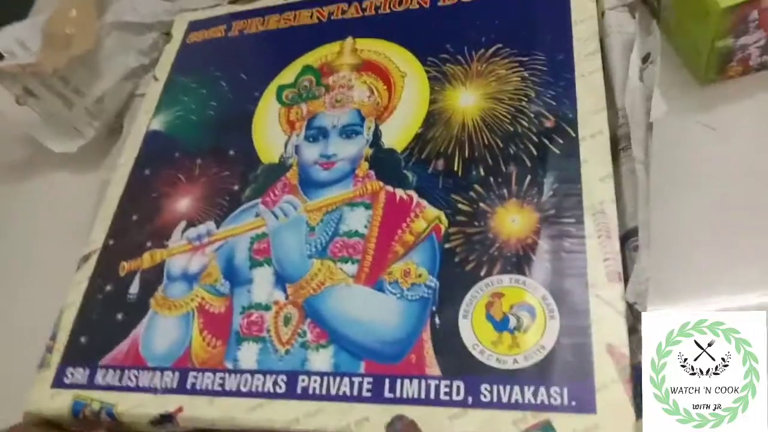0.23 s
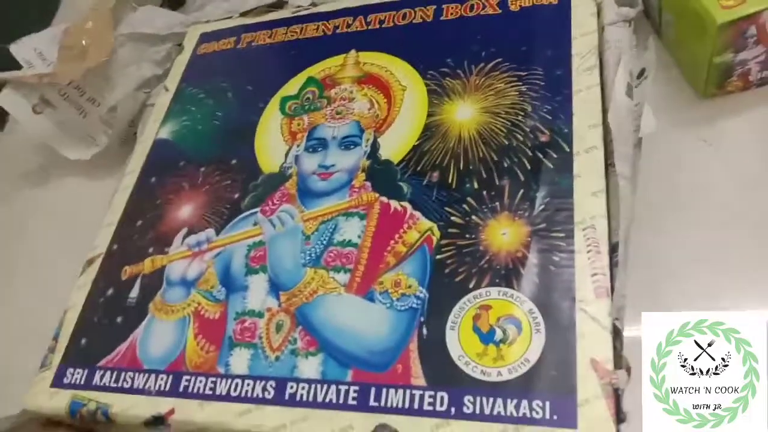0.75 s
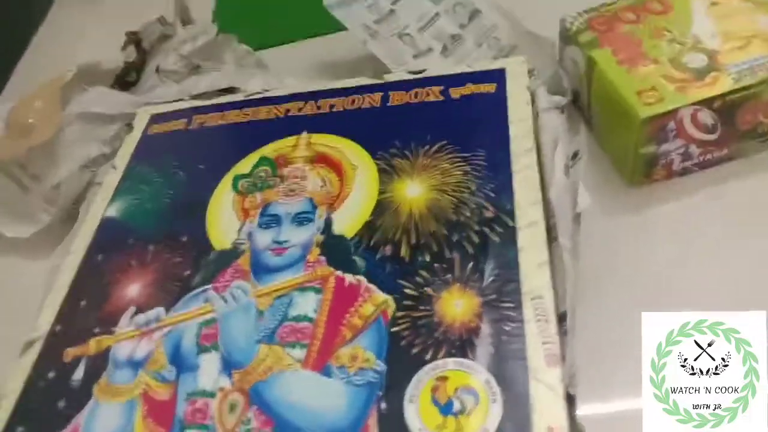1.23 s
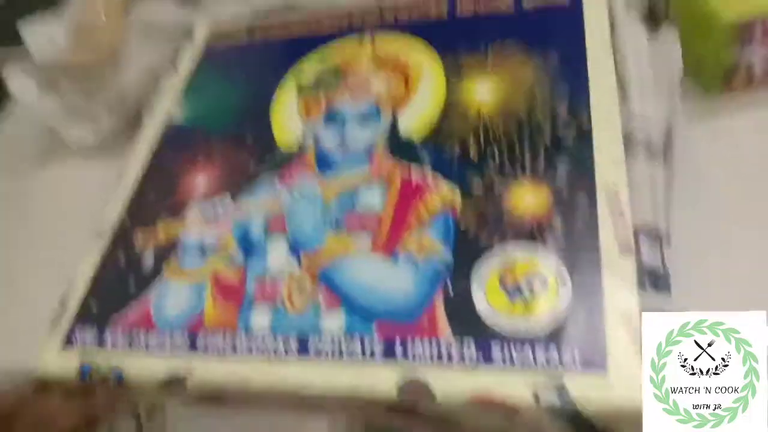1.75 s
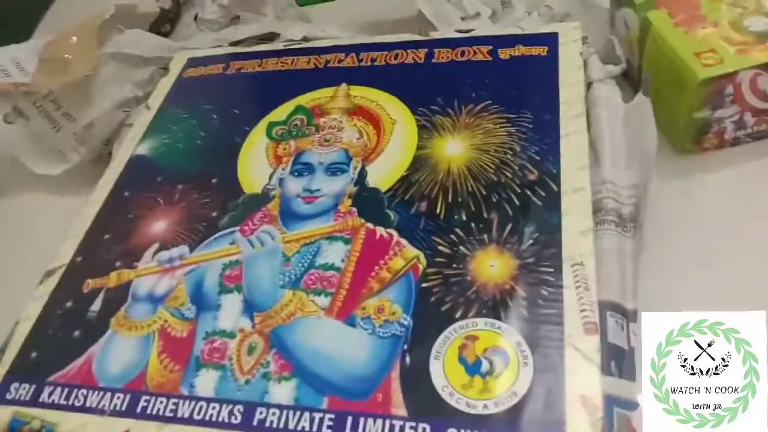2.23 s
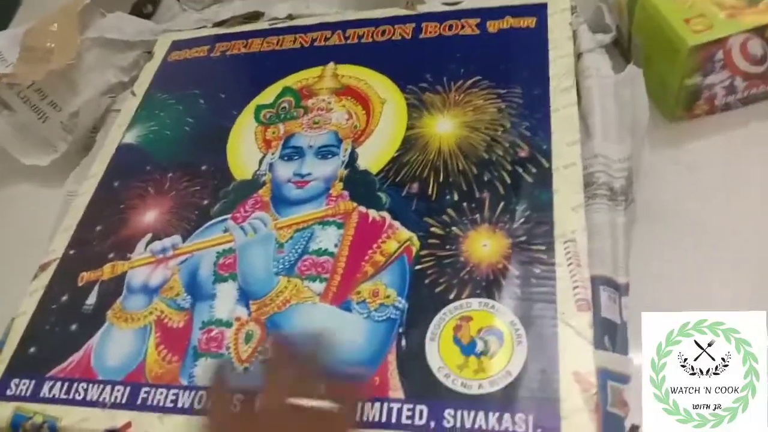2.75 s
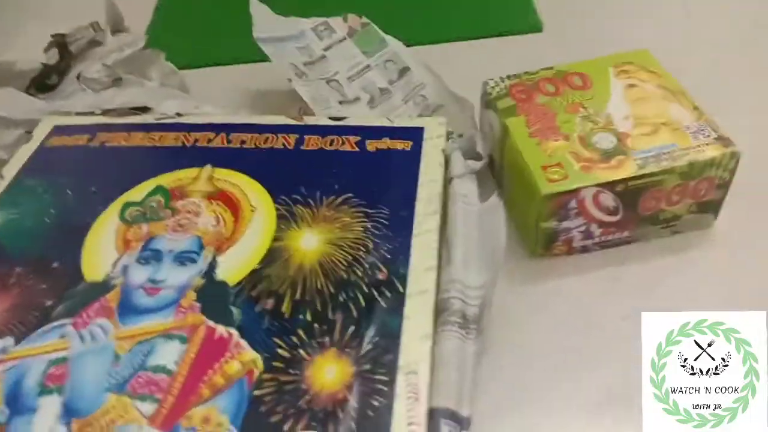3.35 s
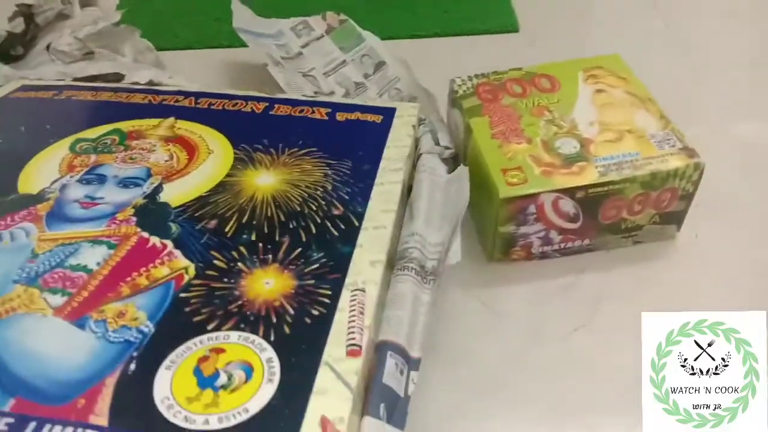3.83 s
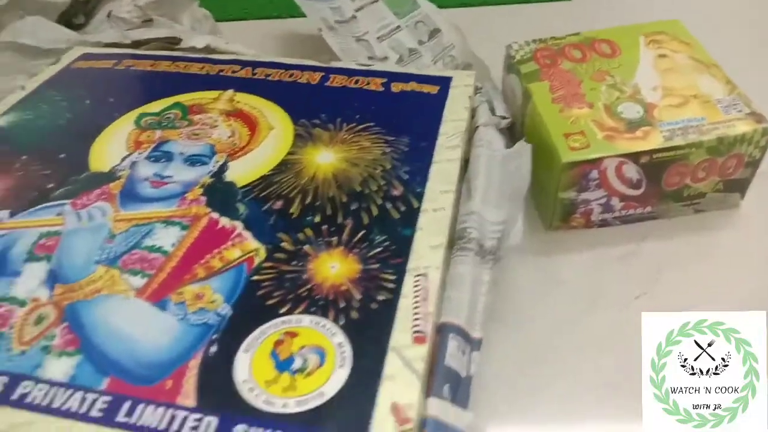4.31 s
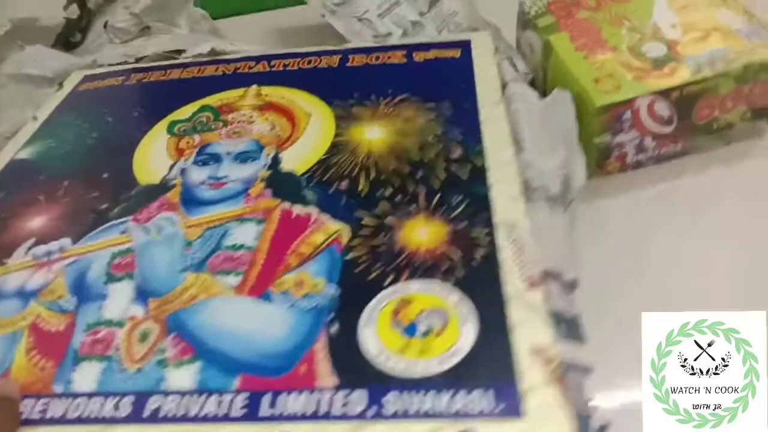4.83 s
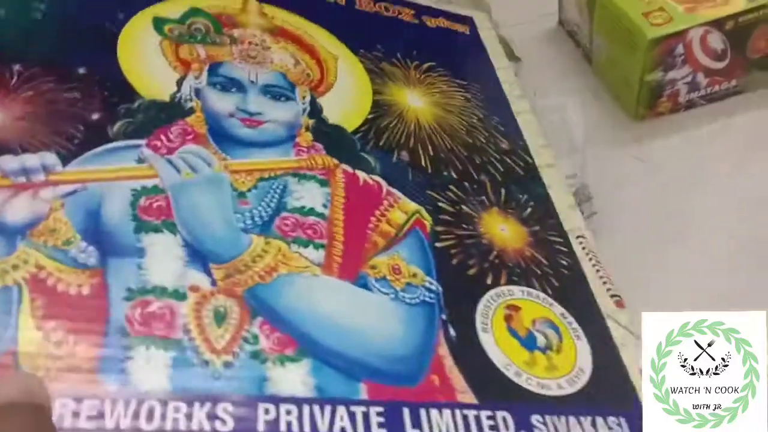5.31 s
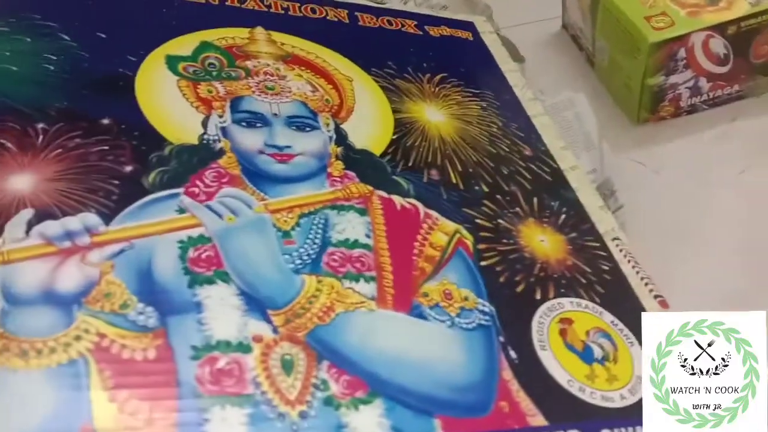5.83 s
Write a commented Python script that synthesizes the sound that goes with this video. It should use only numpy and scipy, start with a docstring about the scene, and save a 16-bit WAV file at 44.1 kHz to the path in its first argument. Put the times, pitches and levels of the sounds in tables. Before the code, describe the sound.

Hands rustle stiff paper and bump a big cardboard box about, sharp crackles and dull thuds ringing in a bare, reverberant room.

```python
"""Paper crinkles and snaps at once over a steady rush of room air, in a bare, echoing tiled room.
A large cardboard box is lifted, tilted and shifted on its newspaper wrapping: swarms of tiny buckles make
the rustle, single creases the snaps, dense stick-slip the rasp. Pushes and rubbing hands excite the damped
modes of the hollow box. Filtered noise makes the air, decaying noise bands the reverberation;
the hand-held phone adds narrow resonances to everything."""
import sys
import numpy as np
from scipy import signal
from scipy.fft import rfft, irfft
from scipy.io import wavfile
from scipy.ndimage import uniform_filter1d

SR = 44100
rng = np.random.default_rng(int(sys.argv[2]) if len(sys.argv) > 2 else 0)


def master(y):
    """Save y as 16-bit WAV."""
    cut = np.clip(np.atleast_2d(y).T, -1, 1)
    pcm = np.round(cut * 32767)  # scale
    wavfile.write(sys.argv[1], SR, pcm.astype(np.int16))


N = 267376
TIME = np.arange(N) / SR
# Event levels in the tables are source levels, ahead of the gains of the mix.
# spectrum of crumpling paper: f/Hz, level/dB
PAPER_SPECTRUM = [(60, -54), (200, -18), (400, -5), (700, -5), (1100, -2), (1700, -2), (2900, 1.5),
                  (3800, -1), (4600, -7), (7000, -10.5), (10000, -5.5), (12000, -13), (15500, -9.5)]
DRAG_SAG_DB_PER_S = 1.5  # drags and scrapes ease slightly while they last


def undb(db):
    """Level to amplitude: 20 dB are a factor of ten."""
    return 10 ** (np.asarray(db) / 20)


def unit(x):
    """Normalisation to an rms value of 1."""
    return x / np.sqrt(np.mean(x ** 2))


def on_log_axis(hz, points):
    """Interpolation of (f/Hz, value) points on a logarithmic frequency axis."""
    f, value = np.transpose(points)
    return np.interp(np.log(np.maximum(hz, 1)), np.log(f), value)


def colour(x, points, size=2048):
    """Minimum-phase filtering: folding the cepstrum makes a (f/Hz, level/dB) response causal."""
    hz = np.arange(size // 2 + 1) * SR / size
    cepstrum = irfft(np.log(undb(on_log_axis(hz, points))))
    cepstrum[1:size // 2] *= 2
    cepstrum[size // 2 + 1:] = 0
    impulse_response = irfft(np.exp(rfft(cepstrum)))
    return signal.fftconvolve(x, impulse_response)[:len(x)]


def ring(x, hz, width_hz):
    """A single damped resonance, with gain 1 at its centre."""
    return signal.lfilter(*signal.iirpeak(hz, hz / width_hz, fs=SR), x)


def lowpass(x, hz, order=2):
    """Butterworth low-pass: a passband without ripple."""
    return signal.sosfilt(signal.butter(order, min(hz, .45 * SR), fs=SR, output="sos"), x)


def brighten(x, db, corner_hz=4800):
    """Spectral tilt: the treble rises by db and the lows fall by half of it, as taut paper is brighter."""
    low = lowpass(x, corner_hz, order=1)
    return low * undb(-db / 2) + (x - low) * undb(db)


def walk(rate):
    """Slow random modulation: straight lines between normal deviates, rate of them per second."""
    knots = rng.standard_normal(int(N / SR * rate) + 2)
    return np.interp(TIME * rate, np.arange(len(knots)), knots)


def slips(rate, spread_db, limit_db):
    """Stick-slip as random impulses, rate per second: many weak ones and a few strong ones."""
    when, strength, side = rng.random((int(rate * N / SR), 3)).T
    level_db = np.minimum(-spread_db * np.log(1 - strength), limit_db)
    impulses = undb(level_db) * np.sign(side - .5)
    return unit(np.bincount((when * N).astype(int), impulses, N))


def add(track, s, sound):
    """Superposition of a sound onto a track from time s."""
    i = max(int(s * SR), 0)
    track[i:i + len(sound)] += sound[:max(N - i, 0)]


def burst_level(x, db, window_s):
    """Energy scaling: a short sound gets the energy of db rms held for window_s."""
    return x * undb(db) * np.sqrt(window_s * SR / np.sum(x ** 2))


def gesture(start, rise, hold, sag_db_per_s, release_s):
    """Envelope of one hand movement: linear attack, steady sag in dB, exponential release."""
    since = TIME - start - rise
    attack = np.clip(1 + since / max(rise, .002), 0, 1)
    sag = undb(-sag_db_per_s * np.maximum(since, 0))
    return attack * sag * np.exp(-np.maximum(since - hold, 0) / release_s)


def room_air(level_db=-43.0, side_db=-25.5, thinning=0.76):
    """Broadband noise: a steady rush whose low bands thin out at random, each on its own; mid and side."""
    # spectrum of the rush: f/Hz, level/dB
    air_spectrum = [(25, -16), (60, -13.5), (130, -0.5), (260, -8.5), (420, 9.5), (700, -3.5), (1100, 2.5),
                    (1800, -2), (2900, -2.5), (5000, -14.5), (8000, -37), (11000, -20), (12500, -56)]
    mid, side = (unit(colour(rng.standard_normal(N), air_spectrum)) for _ in range(2))
    for hz in np.geomspace(90, 750, num=5):
        missing_share = np.clip(thinning * walk(16), 0, .9)
        mid = mid - missing_share * ring(mid, hz, .5 * hz)
    return np.array([mid, undb(side_db) * side]) * undb(level_db + walk(7.3))


def room_tail(build_s=0.0012, size=88200):
    """Diffuse reverberation of hard walls with unit energy: each band decays at its own rate."""
    # reverberation time of the tiled room: f/Hz, T60/s
    decay_times = [(100, 1.64), (400, 1.54), (1200, 1.15), (3000, 0.91), (6000, 0.8), (12000, 0.21)]
    t, hz = np.arange(size) / SR, np.arange(size // 2 + 1) * SR / size
    noise, centres = rfft(rng.standard_normal(size)), np.array(decay_times)[:, 0]
    tail = 0
    # each row of the identity matrix gives one band its share of the spectrum
    for share, (_, t60) in zip(np.eye(len(centres)), decay_times):
        band = irfft(noise * on_log_axis(hz, np.column_stack([centres, share])), size)
        tail = tail + band * np.exp(-np.log(1000) * t / t60)
    return unit(tail * (1 - np.exp(-t / build_s))) / np.sqrt(size)


def taps(hz=1282, width_hz=210, decay_s=0.003, size=2048):
    """Resonance under impact: dull contacts mostly ring the phone's case, with neither bass nor treble."""
    # contacts: t/s, level/dB
    contacts = [(0.693, -33), (0.707, -34), (1.689, -34), (2.193, -42), (2.928, -36), (3.084, -41),
                (3.573, -47), (3.701, -37), (3.916, -36.5), (4.143, -37), (5.002, -35), (5.261, -41)]
    out, t = np.zeros(N), np.arange(size) / SR
    for s, db in contacts:
        contact = rng.standard_normal(size) * np.exp(-t / decay_s)
        ringing = ring(ring(contact, hz, width_hz), hz, width_hz)
        add(out, s, burst_level(ringing, db, window_s=0.0046))
    return out


def cardboard(push):
    """Modal superposition: the hollow box answers with damped modes and radiates little below the lowest."""
    # modes of panels and cavity: f/Hz, width/Hz, level/dB
    box_modes = [(63, 16, 2), (88, 40, 1.5), (133.6, 29, 2.5), (179.5, 28, 3), (227, 31, 0), (292.3, 20, 5),
                 (345, 21, -2), (413, 25, -1.5), (508, 62, 0.5), (634, 123, 2.5), (827, 110, 1.5)]
    panels = sum(undb(db) * ring(push, hz, width) for hz, width, db in box_modes)
    return signal.sosfilt(signal.butter(2, 55, "highpass", fs=SR, output="sos"), panels)


def rub(width_share=1.2, trim_db=-1, uneven_db=4.0, grip_db=-59, grip_hz=150, release_s=0.07):
    """Stick-slip friction of hands and wrapping drums on the box; each contact place favours other modes."""
    # drags on the cardboard: start t/s, rise/s, hold/s, level/dB ahead of the trim, centre f/Hz
    hand_drags = [(0, .02, 0.14, -62, 140), (0.468, 0.018, 0.08, -44.5, 380), (0.688, .01, .12, -48, 750),
                  (0.824, 0.063, 0.026, -48.5, 129), (1.68, 0.025, 0.18, -43.5, 257),
                  (2.114, 0.043, 0.2, -57, 110), (3, 0.038, 0.024, -46, 165),
                  (3.306, 0.056, 0.085, -46, 300), (3.437, 0.0055, .012, -36.5, 655),
                  (3.976, 0.047, 0.2, -46, 200), (4.54, 0.073, 0.25, -40.5, 326),
                  (4.88, 0.093, 0.34, -42.5, 330), (5.446, 0.048, 0.65, -46, 133)]

    def drag(hz):
        """Band-limited stick-slip drives the modes of the box."""
        friction = slips(rate=670, spread_db=0.0, limit_db=-0.5)
        return unit(cardboard(ring(friction, hz, width_share * hz)))

    out = undb(grip_db) * drag(grip_hz)  # fingers shift faintly on the box all along
    for start, rise, hold, db, hz in hand_drags:
        envelope = gesture(start, rise, hold, DRAG_SAG_DB_PER_S, release_s)
        out = out + undb(db) * envelope * drag(hz)
    return out * undb(trim_db + uneven_db * np.minimum(walk(20), 1))


def bumps(size=16384, knock_db=-15.0, scuff_db=-27, soft_hz=1500):
    """Impulse excitation: a push, then a short scuff as the box settles; the spot hit favours some modes."""
    # bumps: t/s, level/dB, centre f/Hz (low where the whole box flexes), scuff decay/s
    box_bumps = [(.425, -46.5, 136, 0.015), (0.696, -34.5, 320, 0.065), (0.918, -42, 186, 0.0095),
                 (1.076, -45, 110, 0.038), (1.686, -39, 183, 0.017), (1.753, -44, 200, .015),
                 (1.934, -35, 201, 0.024), (2.127, -43, 113, 0.0081), (2.186, -39, 95.4, 0.052),
                 (2.241, -41, 94, 0.018), (3.075, -40.5, 186, 0.023), (3.11, -39, 93, 0.013),
                 (3.448, -26.5, 213, 0.0099), (3.467, -35, 557, .02), (3.494, -44, 330, .01),
                 (3.521, -42, 240, 0.0086), (3.575, -35, 285, 0.017), (3.63, -43, 198, 0.023),
                 (4.023, -48, 136, 0.032), (4.166, -42, 435, 0.027), (4.624, -47, 233, 0.021),
                 (4.682, -42, 276, .015), (4.93, -40, 161, 0.013), (5.04, -42, 140, 0.018),
                 (5.101, -41, 165, 0.013), (5.571, -50, 151, 0.015), (5.969, -36, 160, 0.088)]
    out, t = np.zeros(N), np.arange(size) / SR
    for s, db, hz, scuff_s in box_bumps:
        scuff = rng.standard_normal(size) * np.exp(-t / scuff_s)
        push = (t == 0) + undb(scuff_db) * scuff
        flex = ring(ring(push, hz, 0.7 * hz), hz, 0.7 * hz)
        knock = ring(ring(push, 3.2 * hz, 2 * hz), 3.2 * hz, 2 * hz)
        force = lowpass(flex + undb(knock_db) * knock, soft_hz)
        add(out, s, burst_level(cardboard(force), db, window_s=0.03))
    return out


def scrape(uneven_db=2.5, broad_db=-5, hz=2810, width_hz=4800, release_s=0.017):
    """Dense stick-slip: the box slides over the newspaper with one continuous bright rasp."""
    # slides: start t/s, rise/s, hold/s, level/dB
    slides = [(4.876, .06, .16, -39), (5.742, .04, .11, -44), (5.975, .02, .1, -39)]
    gain = 0
    for start, rise, hold, db in slides:
        gain = gain + undb(db) * gesture(start, rise, hold, DRAG_SAG_DB_PER_S, release_s)
    sheet = unit(colour(slips(rate=5000, spread_db=2.5, limit_db=10), PAPER_SPECTRUM))
    rasp = unit(ring(ring(sheet, hz, width_hz), hz, width_hz))
    uneven = undb(uneven_db * np.clip(walk(40), -1.5, 1.5))
    return unit(rasp + undb(broad_db) * sheet) * gain * uneven


def paper_motion(restless_db=3, held_db=-53.5, held_bright_db=-3, sag_db_per_s=25.5, release_s=0.034):
    """Power addition: strokes join the faint crinkling of the held sheet; gives gain and brightness/dB."""
    # pause with the held paper at rest: from t/s, to t/s
    rest = (4.25, 4.5)
    # crumpling strokes: start t/s, rise/s, hold/s, level/dB, brightness/dB
    strokes = [(0, 0.0044, 0.091, -42, 3.5), (0.224, 0.026, 0.17, -40, -1.5),
               (0.474, 0.0091, 0.077, -36, 1.5), (0.609, 0.07, 0.044, -38, 6.5),
               (0.696, 0.012, 0.15, -35, -1.5), (0.823, 0.03, 0.2, -39.5, 4.5),
               (1.105, 0.022, 0.69, -46.5, 4.5), (1.56, 0.11, 0.023, -35.5, 1),
               (1.683, 0.0099, 0.085, -36, -3), (1.89, 0.053, 0.12, -45.5, -0.5),
               (2.223, 0.035, 0.012, -44, -2), (2.353, 0.025, 0.017, -44, 2),
               (2.684, 0.017, 0.0082, -47, 1.5), (2.928, 0.018, 0.19, -51.5, -21),
               (3.234, 0.14, 0.17, -49, -14), (3.456, 0.16, 0.17, -37, -1), (3.8, 0.081, 0.38, -42, -9.5),
               (4.054, 0.065, 0.11, -40, 0), (4.53, .04, .04, -43, -3), (4.59, 0.03, 0.046, -36, 0),
               (4.842, 0.13, 0.14, -34, -5), (5.159, 0.037, 0.094, -41, 1),
               (5.373, 0.063, 0.033, -41, -0.5), (5.51, 0.035, 0.04, -39.5, 3),
               (5.699, 0.073, 0.022, -37.5, -1.5), (5.828, 0.038, 0.019, -38.5, -7.5),
               (5.942, 0.032, 0.067, -43, -12)]
    held = uniform_filter1d(1. * ((TIME < rest[0]) | (TIME > rest[1])), size=2048)
    held_gain = held * undb(held_db + restless_db * np.minimum(walk(10), 1))
    power = held_gain ** 2 + 1e-12
    bright = power * held_bright_db
    for start, rise, hold, db, bright_db in strokes:
        # the sheet gives way under the hand, then settles
        stroke = (undb(db) * gesture(start, rise, hold, sag_db_per_s, release_s)) ** 2
        power, bright = power + stroke, bright + stroke * bright_db
    return np.sqrt(power), bright / power


def rustle(gain, bright_db, sliding_db=-7, flurry_db=3.5, crowd_db=-36, facet_db=4.5,
           scrape_s=0.0018, size=512):
    """Crackling noise: fibres slide, creases buckle in flurries and scrape facets, which take turns."""
    sliding = slips(rate=7000, spread_db=3, limit_db=15)
    facets = 0
    for hz in np.geomspace(900, 11200, num=9):
        buckles = slips(rate=110, spread_db=5.5, limit_db=16)
        facet_scrape = rng.standard_normal(size) * np.exp(-np.arange(size) / SR / scrape_s)
        scraping = signal.oaconvolve(buckles, facet_scrape)[:N]
        facet = unit(ring(scraping, hz, 0.31 * hz)) * hz ** 0.44
        facets = facets + facet * undb(facet_db * np.minimum(walk(25), 1))
    sheet = unit(colour(unit(facets) + undb(sliding_db) * sliding, PAPER_SPECTRUM))
    # in a strong stroke so many buckles overlap that the flurries even out
    flurries = np.clip(walk(90), -2, 2) / np.hypot(1, gain / undb(crowd_db))
    return brighten(sheet, bright_db) * gain * undb(flurry_db * flurries)


def snaps(facet_gain=1.97, rise_share=0.26, top_hz=15100, db_per_octave=10, size=2048):
    """Buckling instability: a big crease gives way in a burst of milliseconds and rings its own facet."""
    # creases giving way: t/s, level/dB, facet f/Hz, brightness/dB, burst decay/s
    creases = [(.044, -23.5, 1105, -26, 0.0037), (0.07, -29.5, 8900, 11, 0.0028),
               (0.237, -32, 3270, 3, 0.005), (.256, -25.5, 3400, -2, 0.0066),
               (0.485, -22.5, 1320, 3, 0.0062), (.494, -26.5, 3300, -4, 0.0047),
               (.526, -29, 3050, 1, 0.005), (0.664, -31, 1300, -6, 0.0038),
               (0.6908, -15.5, 3460, 2, 0.0022), (0.6938, -17, 1400, -3, 0.0017),
               (0.7056, -20.5, 3150, -7, 0.0023), (0.727, -24.5, 3100, 2, .005),
               (0.7428, -23, 3750, -1, 0.007), (0.7502, -31, 1290, -8, 0.0029),
               (.777, -22, 3150, -6, 0.0035), (.8, -33, 2600, 3, 0.0016), (0.867, -33, 2820, 0, 0.0033),
               (1.149, -33, 2500, 7, 0.0043), (1.196, -30.5, 2650, -1, 0.0057),
               (1.318, -35.5, 2600, -9, 0.0017), (1.621, -31.5, 3000, 4, 0.0024),
               (1.688, -20, 1080, 1, 0.004), (1.695, -18.5, 3100, 1, 0.0022),
               (1.7532, -19.5, 2900, 1, 0.00085), (1.755, -18.5, 3950, -1, 0.0039),
               (1.966, -31, 2810, -5, 0.0035), (2.025, -29.5, 2540, -8, 0.005),
               (2.133, -26.5, 2550, -1, 0.0013), (2.27, -37, 2960, 4, .005), (2.297, -30, 2920, 21, 0.0024),
               (2.376, -34.5, 3880, 9, 0.003), (2.393, -33, 3500, 14, 0.00095),
               (2.42, -29.5, 2830, 18, 0.0023), (2.503, -37.5, 5100, 22, 0.0067),
               (2.912, -29.5, 1280, -15, 0.0027), (2.9239, -27, 1290, -19, 0.0017),
               (2.9255, -20.5, 2870, -15, 0.0029), (3.258, -29, 3600, 1.5, 0.0081),
               (3.645, -24.5, 3560, 3, 0.0089), (3.688, -24.5, 2860, -16, 0.0059),
               (3.8796, -25.5, 2020, -6, 0.0042), (3.887, -29, 2820, -11, 0.0023),
               (3.906, -27, 5410, 16, 0.0023), (3.917, -22, 2600, 5, 0.0034),
               (3.954, -27.5, 5630, 15, 0.0054), (4.0033, -27, 2760, -15, 0.0047),
               (4.015, -26.5, 3020, -6, 0.0044), (4.144, -25, 2700, -27, 0.0053),
               (4.17, -27.5, 1990, -8, 0.0054), (4.582, -28.5, 2940, 12, 0.0035),
               (4.617, -27, 3080, 12, 0.0048), (4.6266, -23, 3480, 17, .008), (4.656, -34, 2980, 7, .004),
               (4.851, -24, 3060, 20, 0.0091), (4.8907, -21.5, 2900, -6, 0.0037),
               (4.9104, -23, 2730, -19, 0.0034), (4.948, -25, 2770, 2, 0.0033),
               (5.0428, -27, 3060, -2, 0.0041), (5.078, -22.5, 2390, -21, 0.0046),
               (5.094, -26, 2900, 14, 0.0053), (5.2655, -33, 2240, 6, 0.0016),
               (5.422, -32, 2660, 14, 0.0034), (5.433, -29.5, 5200, 11, 0.0036),
               (5.556, -24.5, 3770, 12, 0.004), (5.719, -30, 3200, 14, 0.0082),
               (5.7633, -31, 3160, -2, 0.0069), (5.8001, -23.5, 2640, -8, 0.012),
               (5.889, -26, 1700, -2, 0.007), (5.979, -27, 4030, 0, 0.0094)]
    out, t = np.zeros(N), np.arange(size) / SR
    for s, db, hz, bright_db, length_s in creases:
        onset = np.minimum(t / (rise_share * length_s), 1)
        burst = rng.choice([-1, 1], size) * np.exp(-(t / length_s) ** 1.2) * onset
        facet = facet_gain * ring(burst, hz, 0.14 * hz)
        snap = brighten(colour(burst + facet, PAPER_SPECTRUM), bright_db)
        # slack creases lose their top
        snap = lowpass(snap, top_hz * 2 ** (bright_db / db_per_octave))
        add(out, s, burst_level(snap, db, window_s=0.0017))
    return out


def dip_lows(x, corner_hz=800):
    """Band-limited gain modulation: the lows dip briefly now and then."""
    # dips: t/s, half length/s
    dips = [(0.467, 0.016), (0.654, 0.018), (1.024, 0.029), (1.535, 0.011), (1.614, 0.0068), (1.81, 0.03),
            (2.443, 0.021), (3.26, 0.01)]
    dip = sum(np.exp(-((TIME - s) / half_s) ** 4) for s, half_s in dips)
    lows = signal.sosfiltfilt(signal.butter(2, corner_hz, fs=SR, output="sos"), x)
    return x - np.clip(dip, 0, 1) * lows


def scene(rustle_wet_db=-4, snap_wet_db=-5, box_wet_db=-15, far_side_db=-16.0, near_side_db=-7,
          box_side_db=-4, slant_s=.0008, count=2):
    """Superposition of direct sound, first echoes and reverberation; nearly mono, as mid plus or minus side."""
    # first echoes from floor and walls: delay t/s, level/dB
    first_echoes = [(.0029, -37), (.0052, -16.5), (0.015, -18.5)]
    motion = paper_motion()
    paper = rustle(*motion) + scrape() + snaps()
    box = bumps() + rub()
    early, slanting = np.zeros(N), np.zeros(N)
    for s, db in first_echoes:
        add(early, s, undb(db) * (paper + box))
        # echoes from the sides come a little later and differ between the two channels
        from_side = undb(near_side_db) * paper + undb(box_side_db) * box
        add(slanting, s + slant_s, undb(db) * from_side)
    far_mid, far_side = 0, 0
    for _ in range(count):
        # fresh draws of rustle, scrape and snaps feed each pair of tails: the reverberation sounds smoother
        send = undb(rustle_wet_db) * (rustle(*motion) + scrape())
        # snaps lose a little of their edge on the way
        send = send + undb(snap_wet_db) * brighten(snaps(), -0.15) + undb(box_wet_db) * box
        far_mid = far_mid + signal.fftconvolve(send, room_tail())[:N]
        far_side = far_side + signal.fftconvolve(send, room_tail())[:N]
    air_mid, air_side = room_air()
    mid = undb(-1.0) * (paper + box + early + far_mid) + taps() + air_mid
    # the side levels above hold ahead of this tilt and halving
    side = brighten(undb(far_side_db) * far_side + slanting, 3.9) / 2 + air_side
    return dip_lows(np.array([mid + side, mid - side]))


def record(dry, treble_hz=11300, top_hz=15200):
    """Linear filtering by the phone: narrow resonances, a rolled-off high treble and a steep cut at the top."""
    # case and microphone port: f/Hz, width/Hz, gain added to the flat response
    phone_modes = [(1267, 51, 2.23), (3160, 19, 0.14), (5630, 990, 1.18), (6720, 140, 1.5),
                   (7200, 180, 1.6), (8900, 370, 0.39)]
    resonances = sum(gain * ring(dry, hz, width) for hz, width, gain in phone_modes)
    coloured = lowpass(dry + resonances, treble_hz, order=4)
    top_cut = signal.ellip(8, .2, 80, top_hz, fs=SR, output="sos")
    return signal.sosfilt(top_cut, undb(-2.5) * coloured)


dry = scene()
out = record(dry)
master(out)
```